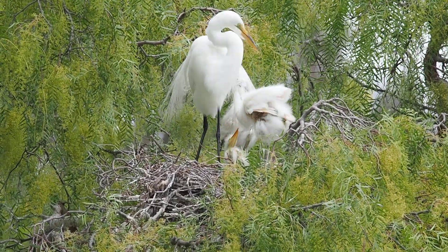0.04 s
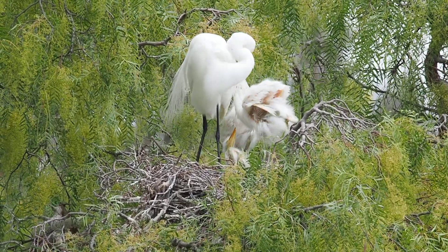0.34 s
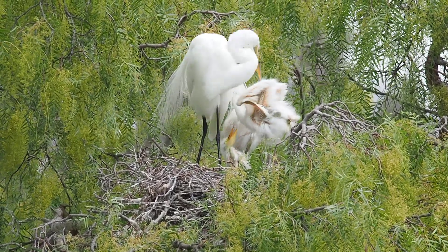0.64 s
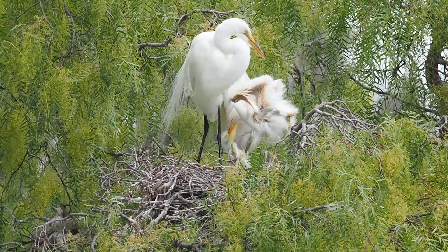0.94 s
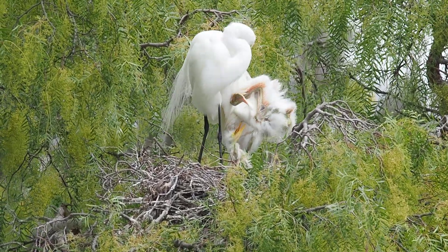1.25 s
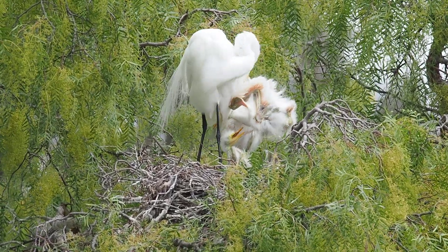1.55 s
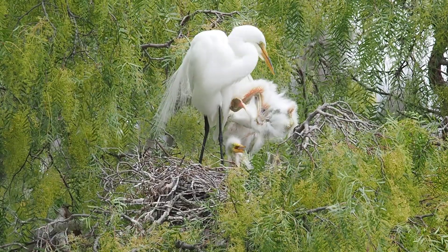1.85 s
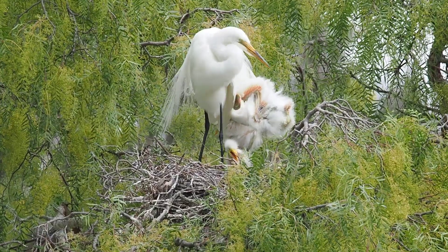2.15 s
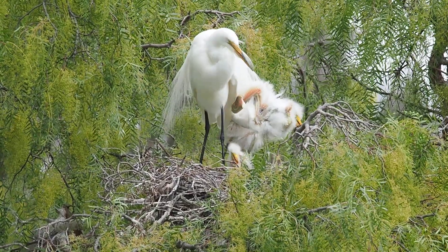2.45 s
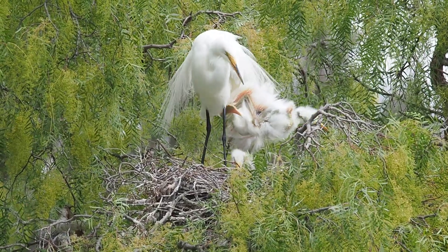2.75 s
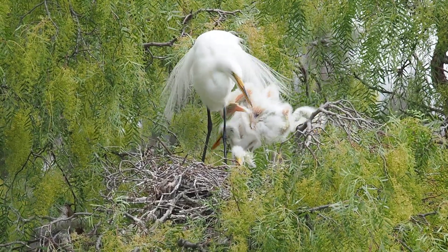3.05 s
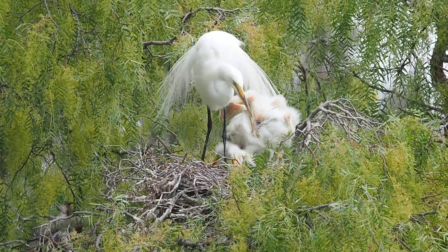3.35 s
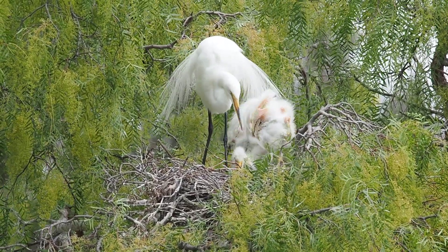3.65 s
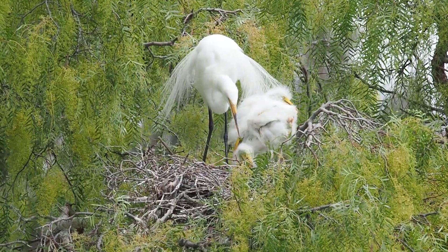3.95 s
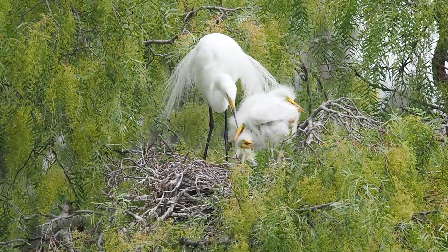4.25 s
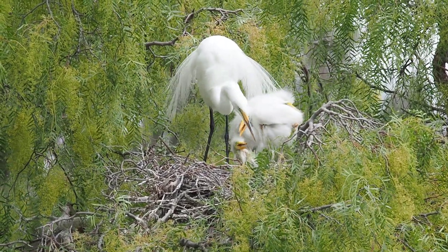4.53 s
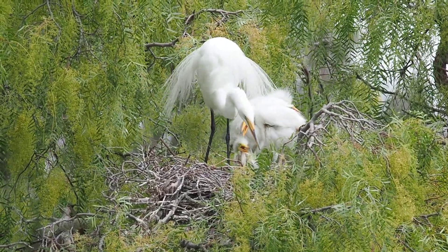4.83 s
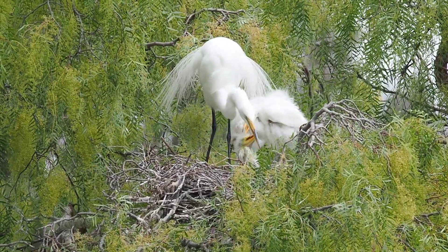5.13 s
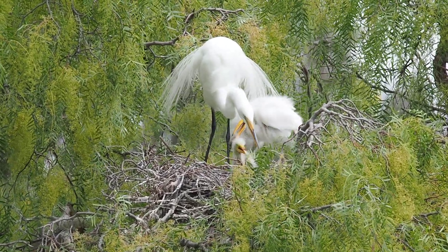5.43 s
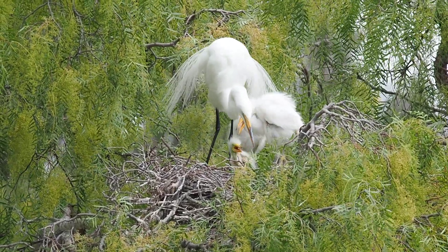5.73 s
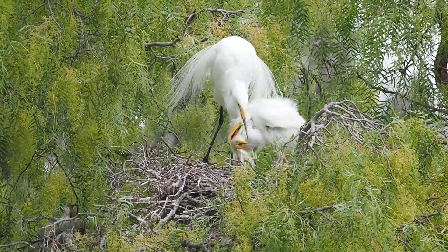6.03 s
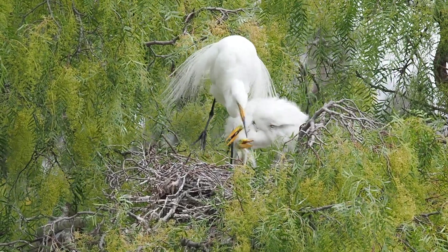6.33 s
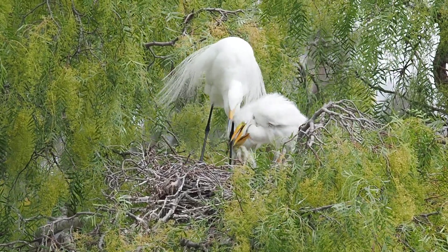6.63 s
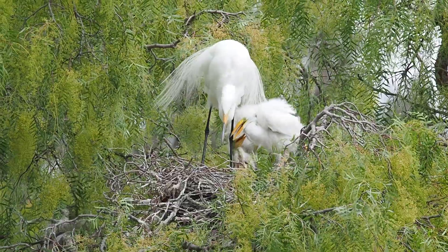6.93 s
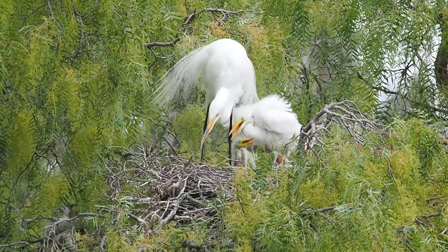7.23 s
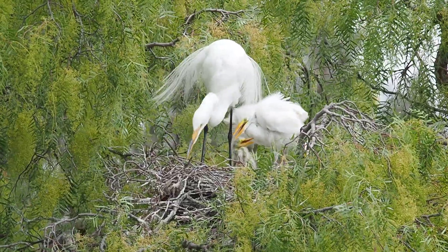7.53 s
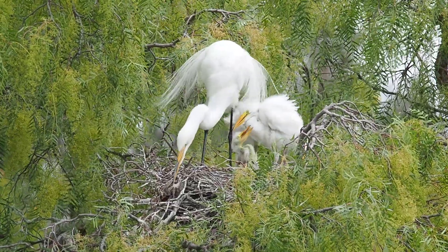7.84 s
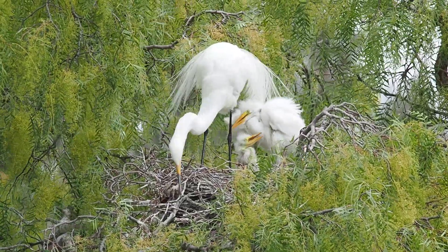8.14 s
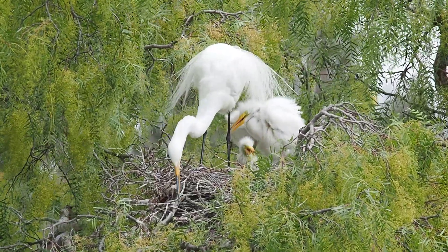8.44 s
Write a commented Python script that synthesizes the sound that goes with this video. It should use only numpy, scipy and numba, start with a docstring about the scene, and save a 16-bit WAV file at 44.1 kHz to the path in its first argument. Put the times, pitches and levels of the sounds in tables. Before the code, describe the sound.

Egret chicks beg from a nest in a tree some way off, with short, raspy, overlapping keks that never let up. Gusty wind rumbles and thumps on the microphone over a steady wash of distant traffic. Leaves hiss faintly early on. After a second, a faint hoarse rasp repeats far to the right, and a water bird honks briefly near four and seven seconds, with a faint echo.

```python
"""From the start, turbulent wind buffets the two microphone ports over a distant traffic wash.
At once egret chicks beg from a nest in a tree, some way off: short, raspy, overlapping keks, each a
pulse train filtered by throat and bill. Leaves hiss and other birds add a few soft notes. After a
second, something hoarse starts to rasp faintly about once a second. Near four and seven seconds a
water bird honks, and the far bank returns an echo."""
import sys
import numpy as np
from scipy import signal
from scipy.fft import rfft, irfft
from scipy.io import wavfile
from scipy.ndimage import uniform_filter1d
from numba import njit

SR = 44100
rng = np.random.default_rng(int(sys.argv[2]) if len(sys.argv) > 2 else 0)


def digitize_waveform(pressure):
    """Quantize a signal to 16-bit integers and store it at the path in sys.argv[1].

    Rows of a 2-D input are taken as channels; values are limited to [-1, 1].
    """
    field = np.atleast_2d(pressure).T
    bounded = np.clip(field, -1, 1)
    quanta = np.round(bounded * 32767).astype(np.int16)
    wavfile.write(sys.argv[1], SR, quanta)


N = 382788
T = np.arange(N) / SR
MODERATE_DB = -23  # level of a moderate gust


def undb(db):
    """Amplitude grows tenfold every 20 decibels."""
    return 10 ** (np.asarray(db) / 20)


def unit(x):
    """Normalisation to rms 1."""
    return x / np.sqrt(np.mean(x ** 2) + 1e-20)


def at_hz(points, hz):
    """Interpolation of (Hz, value) points on a log-frequency axis."""
    f, value = np.transpose(points)
    return np.interp(np.log(hz + 1e-3), np.log(f), value)


def colour(x, points):
    """Spectral shaping by a gain curve of (Hz, dB) points; the result has rms 1."""
    hz = np.fft.rfftfreq(x.shape[-1], 1 / SR)
    return unit(irfft(rfft(x) * undb(at_hz(points, hz)), x.shape[-1]))


def walk(rate, size=N):
    """Smooth random modulation of spread 1 that changes about rate times a second."""
    k = max(int(SR / rate), 2)
    held = np.repeat(rng.standard_normal(size // k + 2), k)
    return 1.235 * uniform_filter1d(held, k)[k // 2:k // 2 + size]


def add(out, s, x):
    """Superposition: x joins the mix at s seconds."""
    i = max(int(s * SR), 0)
    out[..., i:i + x.shape[-1]] += x[..., :max(N - i, 0)]


def pan(db):
    """Direction as a level difference, left minus right."""
    return undb(np.array([[db], [-db]]) / 2)


def arch(size):
    """A half-sine envelope, from silence to silence."""
    return np.sin(np.linspace(0, np.pi, size)).clip(0)


def swells(rows):
    """An amplitude envelope made of (start, length, dB) arches."""
    out = np.zeros(N)
    for s, length, db in rows:
        add(out, s, undb(db) * arch(int(length * SR)))
    return out


def gust_force():
    """Unsteady airflow: its strength at each port, in dB above a moderate gust."""
    # Each row: time in seconds, left level in dB, right level in dB.
    gusts = [(0.0, -25, -17), (0.18, -40, -27.5), (0.28, -38, -18), (0.58, -29.5, -20), (0.84, -38, -39),
             (0.98, -30, -19), (1.34, -31.5, -20.5), (1.56, -32.5, -27.5), (1.86, -40.5, -25.5),
             (2.08, -31, -37.5), (2.16, -42, -40.5), (2.36, -24.5, -26), (2.42, -18, -30.5),
             (2.78, -32.5, -19.5), (2.94, -26, -19.5), (3.32, -38.5, -41), (3.4, -31.5, -27),
             (3.62, -38, -19.5), (3.7, -31, -38.5), (3.76, -44, -41.5), (3.879, -33, -22.5),
             (4.18, -30, -21), (4.3, -35.5, -35), (4.36, -25.5, -28.5), (4.621, -39.5, -20.5),
             (4.88, -27, -18), (4.96, -32, -28), (5.12, -33, -23), (5.42, -25.5, -36), (5.5, -35, -35.5),
             (5.58, -30, -19.5), (5.74, -23.5, -19), (5.82, -37, -20.5), (6.24, -34, -21), (6.34, -29, -28),
             (6.62, -35, -28), (7.48, -26.5, -24), (8.16, -36, -25), (8.24, -37.5, -35), (8.66, -27, -22.5)]
    s, *ports = np.transpose(gusts)
    return np.array([np.interp(T, s, gust_db) for gust_db in ports]) - MODERATE_DB


def wind(flutter_db=(2.5, 1.82), trim_db=(.13, 1.66), burst_db=2.49, brighten=.4):
    """Turbulence at each port: faster air sheds smaller eddies, so upper octaves swell most, in bursts."""
    # Buffeting in a moderate gust. Each row: frequency in Hz, relative spectral density in dB.
    buffet = [(20, -60), (35, -17.5), (55, -3), (80, 0.5), (125, 1.5), (200, -3.5), (300, -15), (450, -21),
              (700, -37.5), (1200, -45), (2500, -59)]
    octaves = np.log2((np.fft.rfftfreq(N, 1 / SR) + 1e-3) / 125)
    out = np.zeros((2, N))
    for port, force_db, depth, trim in zip(out, gust_force(), flutter_db, trim_db):
        flutter = depth * walk(30)  # more fitful on the sheltered left
        bursts = burst_db * walk(130)
        eddies = rfft(colour(rng.standard_normal(N), buffet + [(6000, -110)]))
        for octave in range(-3, 5):
            band = irfft(eddies * (1 - abs(octaves - octave)).clip(0), N)
            swell_db = force_db * (1 + brighten * np.clip(octave, -1, 2))
            swing_db = swell_db + flutter + bursts * np.clip(octave, 0, 2)
            port += band * undb(MODERATE_DB + trim + swing_db)
    return out


def sputter(per_s=70, db=-44, steepness=2.2, scatter_db=4):
    """Shot noise: tiny eddies pop at random at each port, growing steeply with the gust."""
    # Spectrum of a pop. Each row: frequency in Hz, relative spectral density in dB.
    spectrum = [(120, -28), (300, 1), (430, 0.5), (700, -4.5), (1100, -18.5), (2200, -50), (6000, -80)]
    pops = (rng.random((2, N)) < per_s / SR) * rng.choice([-1, 1], (2, N))
    sizes = undb(scatter_db * rng.uniform(-1.5, 1, (2, N)))
    return colour(pops * sizes, spectrum) * undb(db + steepness * gust_force())


def far_noise():
    """Partial coherence: noise from all around is alike at both ports in the midrange, not the treble."""
    # Each row: frequency in Hz, correlation between the ports from 0 to 1.
    likeness = [(60, 0.3), (300, 0.8), (700, 0.96), (1400, 0.4), (3200, 0.04), (7000, 0.07), (15000, 0)]
    alike = at_hz(likeness, np.fft.rfftfreq(N, 1 / SR)).clip(0, 1)
    mid, side = rfft(rng.standard_normal((2, N))) * np.sqrt([1 + alike, 1 - alike])
    return irfft(np.array([mid + side, mid - side]), N)


def wash(db=-44, wander_db=.063):
    """Distant traffic and the far colony sum incoherently to a nearly steady noise."""
    # Each row: frequency in Hz, relative spectral density in dB.
    spectrum = [(25, 7.5), (100, 5.5), (250, -20), (430, 2.5), (550, -11.5), (700, 0.5), (950, 2),
                (1400, -4.5), (2000, -14.5), (2600, -15), (3400, -9), (4300, -14.5), (5000, -26),
                (8000, -25.5), (15500, -31)]
    return colour(far_noise(), spectrum) * undb(db + wander_db * walk(5.9))


def trees(x, wet_db, t60):
    """Scattering by trunks and foliage adds a diffuse tail that falls 60 dB in t60 seconds."""
    t = np.arange(SR // 2) / SR
    tail = rng.standard_normal((2, len(t))) * np.exp(-np.log(1000) * t / t60) * (t > .003)
    tail /= np.sqrt(np.sum(tail ** 2, axis=1, keepdims=True))
    return x + undb(wet_db) * signal.fftconvolve(np.atleast_2d(x), tail, axes=1)[:, :N]


def bird_notes():
    """Frequency glides: other birds give short, soft, nearly pure tones."""
    # Each row: start and length in seconds, first and last pitch in Hz, peak in dB,
    # left minus right in dB.
    glides = [(7.715, 0.016, 870, 1086, -26.5, -4), (5.275, 0.069, 385, 650, -43, -3),
              (0.083, 0.03, 3200, 2850, -46, -2)]
    out = np.zeros((2, N))
    for s, length, start_hz, end_hz, db, pan_db in glides:
        size, note = int(length * SR), np.zeros(N)
        phase = 2 * np.pi * np.cumsum(np.linspace(start_hz, end_hz, size)) / SR
        add(note, s, undb(db) * np.sqrt(arch(size)) * np.sin(phase))
        out += trees(note, wet_db=-4, t60=.15) * pan(pan_db)
    return out


def syrinx(hz, rough):
    """A pulse source with a puff of air in each cycle; jitter, shimmer and breath grow with roughness."""
    size = len(hz)
    jitter = .018 * walk(160, size) + .045 * rough * walk(400, size)
    cycles = np.cumsum(hz * (1 + jitter)) / SR + rng.random()
    from_pulse = (cycles + .5) % 1 - .5
    shimmer = undb((2 + 2.5 * rough) * walk(260, size))
    pulses = np.sinc(.8 * from_pulse * SR / hz) * shimmer
    air = rng.standard_normal(size) * np.exp(-(cycles % 1) / .45)
    return unit(pulses) + (.15 + .5 * rough) * unit(air)


@njit
def resonate(x, hz, width):
    """A moving resonance: a band-pass of fixed width in Hz whose centre follows hz."""
    y, band, low = np.empty(len(x)), 0., 0.
    for i in range(len(x)):
        g, k = np.tan(np.pi * hz[i] / SR), width / hz[i]
        v = (band + g * (x[i] - low)) / (1 + g * (g + k))
        band, low, y[i] = 2 * v - band, low + 2 * g * v, k * v
    return y


def kek(length, hz, throat_hz, db, bright_db, bill_hz=5700, bill_width_hz=1200.):
    """Source and filter: pitch and resonances rise as the bill opens and fall as it shuts."""
    # The voice, from broad clack to narrow squeak. Each row: pitch in Hz, throat bandwidth in Hz,
    # fall of its resonance as a share, roughness from 0 to 1, then bill ring, sizzle and croak in dB.
    voices = [(318, 770, .02, .34, -2, -10.5, -7.5), (450, 740, .06, .44, -9.5, -9, -14),
              (640, 470, 0.073, .48, -14.5, -9, -21)]
    # Fixed midrange colour of the calls, as the microphone hears them.
    # Each row: frequency in Hz, gain in dB.
    body_curve = [(1200, -9), (2000, -7.5), (2600, 1.5), (3050, 6), (3500, 3.5), (4250, 5), (4700, -6),
                  (6000, -41)]
    # Colours of the ring, sizzle and croak. Each row: frequency in Hz, gain in dB.
    bill_curve = [(3000, 6), (4000, -8), (4700, -3.5), (5600, -7), (6200, -10), (6800, -11), (8500, -13)]
    sizzle_curve = [(5800, 0.5), (7300, -4), (8200, 1), (8800, -10), (9600, 1.5), (11000, -11.5),
                    (13000, -13), (15500, -27)]
    croak_curve = [(600, -30), (1200, -13), (1700, 8), (2100, -5), (2600, -6), (3600, -30), (6000, -50)]
    pitches, *traits = np.transpose(voices)
    width_hz, fall, rough, ring_db, sizzle_db, croak_db = (np.interp(hz, pitches, c) for c in traits)
    slide, hoarse = rng.standard_normal(2) * [.05, .075]  # no two calls bend or rasp alike
    swell = arch(int(length * SR))
    progress = np.linspace(0, 1, len(swell))
    gape = np.sin(np.pi * progress ** .78).clip(0)  # the bill opens faster than it closes
    pitch = hz * (1 + .11 * (gape - .88) + slide * (progress - .5))
    voice = syrinx(pitch, np.clip(rough + hoarse, 0, 1))
    formant = throat_hz * (1 + .2 * (gape - .8) - fall * (progress - .5))
    throat = resonate(colour(voice, body_curve), formant, float(width_hz))
    bill = resonate(colour(voice, bill_curve), bill_hz * (1 + .3 * (gape - .95)), bill_width_hz)
    ring = undb(ring_db) * unit(bill * swell ** 1.5)  # strongest while the bill is wide open
    sizzle = undb(sizzle_db) * unit(colour(voice, sizzle_curve) * swell)
    croak = undb(croak_db) * unit(colour(voice, croak_curve) * swell)
    body = unit(throat * gape ** .5) + croak
    return undb(db) * body, undb(db + bright_db) * (ring + sizzle)


def twigs(x, echo_db, count=6):
    """Early reflections off nest and branches, anew for each port and each turn of the head."""
    out = np.array([x, x])
    for port in out:
        for lag, sign in zip(rng.integers(8, SR // 160, count), rng.choice([-1, 1], count)):
            port[lag:] += sign * undb(echo_db) * x[:-lag]
    return out / np.sqrt(1 + count * undb(echo_db) ** 2)


def chicks():
    """Superposition of begging calls, reflected by the nest and scattered by the tree."""
    # Each row: start and length in seconds, pitch and throat resonance in Hz, level in dB,
    # brightness in dB (the wider the bill opens, the brighter).
    calls = [(0.091, 0.076, 378, 3260, -51.5, -6), (.2, 0.1, 470, 3560, -49.5, -5),
             (.302, .088, 387, 3460, -46.5, -5), (.47, 0.09, 501, 3550, -47, -5.5),
             (.56, .13, 519, 3380, -48.5, -12), (.746, 0.079, 383, 3450, -51.5, -11),
             (.814, .1, 453, 3370, -48.5, -6), (.934, .048, 603, 2500, -54, -4),
             (1.02, 0.057, 402, 3400, -47, -10), (1.075, 0.087, 337, 3670, -52, -5),
             (1.179, 0.055, 565, 2950, -48, -6), (1.239, 0.12, 421, 3620, -49.5, -10),
             (1.42, 0.1, 334, 3580, -50.5, -4), (1.537, 0.12, 499, 3200, -47, -7),
             (1.676, .094, 410, 3700, -51.5, 1), (1.722, .096, 332, 3200, -49, -6),
             (1.82, 0.048, 575, 3260, -46, -9), (1.871, 0.036, 634, 2900, -53, -6),
             (1.927, 0.054, 285, 3900, -56, -3), (1.962, 0.078, 445, 3730, -50.5, -19),
             (2.022, .11, 455.4, 3450, -48.5, -1), (2.188, 0.13, 487, 3570, -47.5, -7.5),
             (2.285, 0.078, 455, 3580, -49.5, 2), (2.376, 0.08, 311.6, 3900, -51, -7),
             (2.501, .061, 626, 3270, -47, -4), (2.622, 0.12, 498, 3670, -47, -3),
             (2.787, 0.075, 329, 3700, -50, -3), (2.923, 0.069, 621, 3470, -44.5, -3),
             (2.963, 0.083, 327, 3440, -51, 1.5), (3.019, .1, 403, 3730, -53, -10),
             (3.259, 0.1, 613, 3480, -45.5, -2), (3.39, .11, 509, 3600, -53, -2.5),
             (3.517, 0.079, 632, 3360, -45.5, -3), (3.575, 0.082, 329, 3630, -52.5, -4),
             (3.842, .11, 331.4, 3560, -46, -10), (4.01, 0.096, 327, 3600, -51.5, 2),
             (4.11, 0.084, 610, 3220, -44, -3.5), (4.229, 0.14, 505, 3360, -49, -8),
             (4.434, .11, 303, 3460, -47.5, -5.5), (4.678, 0.11, 527, 3440, -47, -4.5),
             (4.785, 0.065, 614, 3100, -48.5, -5), (4.858, 0.074, 392, 3540, -51.5, 1),
             (5.059, 0.1, 422, 3500, -49.5, -3.5), (5.139, 0.069, 507, 3600, -49.5, -11),
             (5.246, 0.078, 637, 3630, -54, -8), (5.313, 0.097, 337, 3360, -48.5, -3),
             (5.573, 0.1, 288.5, 3760, -51, -6), (5.683, 0.045, 606, 3600, -45, -7),
             (5.736, 0.11, 319, 3140, -54.5, 0.5), (5.926, .071, 431, 3530, -51, -17),
             (6.033, 0.067, 632, 3620, -45.5, -9), (6.187, 0.085, 325, 3430, -51, 0.5),
             (6.414, 0.1, 427, 3510, -49.5, -1), (6.596, 0.083, 335, 3790, -58.5, 7),
             (6.701, 0.058, 625, 3680, -44, -4.5), (6.87, 0.11, 393, 3540, -47.5, -11),
             (7.044, 0.077, 468, 3800, -51, -3), (7.059, 0.076, 341, 3700, -49.5, -5),
             (7.18, .051, 458, 3330, -51.5, -8), (7.229, 0.11, 331, 3150, -56, 1),
             (7.312, .066, 630, 3600, -48, 2), (7.373, 0.06, 641, 3200, -53.5, 3),
             (7.567, .083, 429, 3700, -51.5, -14), (7.662, 0.074, 542, 3770, -46.5, -3),
             (7.702, .1, 332, 3000, -51, -3), (7.862, 0.047, 579, 2690, -51, -8),
             (7.941, 0.05, 294, 3200, -46, -8), (8.001, 0.085, 493, 3530, -47, -3),
             (8.147, 0.11, 456, 3200, -49.5, -10), (8.28, 0.09, 566, 3570, -48, -0.5),
             (8.391, 0.07, 393, 2700, -50.5, -3), (8.443, 0.096, 478, 3620, -50, -6),
             (8.629, 0.13, 450, 3140, -49, -2)]
    low, high = np.zeros((2, 2, N))
    for s, *call in calls + chatter():
        body, treble = kek(*call)
        add(low, s, twigs(body, echo_db=-14))
        add(high, s, twigs(treble, echo_db=-7.5))
    # leaves absorb the treble, so its tail is weaker
    return (trees(low, wet_db=-4, t60=.14) + trees(high, wet_db=-12, t60=.26)) * pan(db=1.5)


def chatter(gap_s=.33, length_s=.075, hz=479, throat_hz=3680, db=-51.5, bright_db=-8, spread=.12):
    """Random variation about one call gives rows of weaker, duller keks from deeper in the nest."""
    starts = np.arange(0, T[-1], gap_s)
    chance = rng.uniform(-1.1, 1, (len(starts), 4))
    return [(s + gap_s * (1 + late) / 2, length_s, hz * (1 + spread * sharp),
             throat_hz * (1 + spread * tight), db + 3 * loud, bright_db)
            for s, (late, sharp, tight, loud) in zip(starts, chance)]


def leaves(flutter_db=2):
    """Amplitude-modulated treble noise: leaves overhead hiss in the breeze."""
    # Each row: start in seconds, length in seconds, level in dB.
    breezes = [(.15, 0.98, -69), (1.3, 0.5, -58.5), (2.3, 0.47, -66)]
    # Each row: frequency in Hz, gain in dB.
    spectrum = [(4000, -43), (5200, 3), (6400, 7), (7400, -2), (8400, -4), (9500, -18), (13000, -22)]
    return colour(far_noise(), spectrum) * swells(breezes) * undb(flutter_db * walk(40.6))


def thumps(cycles=.4):
    """A pressure transient: an eddy hits a port and gives it a single swing."""
    # Each row: time in seconds, peak in dB, frequency in Hz, left minus right in dB.
    eddies = [(0.468, -20, 330, -19), (1.041, -20, 121, -22), (1.484, -18, 280, -25),
              (2.386, -15.5, 178, 21.5), (2.436, -14.5, 146, 22), (2.892, -17, 139, 14),
              (3.143, -22, 142, 23), (4.404, -13, 151, 2), (5.222, -32, 146, 14), (5.397, -22.5, 161, 25.5),
              (5.732, -12, 124, 18), (6.324, -17, 133, 20), (6.641, -16, 131, -15),
              (6.896, -23.5, 161, -24), (7.059, -18.5, 288, -23), (7.436, -18, 162, 13),
              (7.686, -23.5, 131, -25)]
    out = np.zeros((2, N))
    t = np.arange(-SR // 50, SR // 50) / SR
    for s, db, hz, pan_db in eddies:
        swing = -np.cos(2 * np.pi * hz * t) * np.exp(-(hz * t / cycles) ** 2)
        add(out, s + t[0], undb(db) * pan(pan_db) * swing)
    return out


def rasps(flutter_db=1.5):
    """Narrow-band noise in fluttering swells: something hoarse, far off to the right."""
    # Each row: start in seconds, length in seconds, level in dB.
    calls = [(1.25, 0.77, -47), (2.3, 0.65, -51), (3.55, 0.68, -46.5), (4.55, 0.54, -50.5),
             (5.72, 0.68, -47.5), (6.95, 0.66, -51), (8.1, 0.61, -45.5)]
    # Each row: frequency in Hz, gain in dB.
    spectrum = [(400, -45), (800, -22), (1150, -11), (1280, -4), (1400, 0), (1480, -5), (1580, -14),
                (1720, -16), (1900, -30), (3000, -38), (6000, -65)]
    return colour(far_noise(), spectrum) * swells(calls) * undb(flutter_db * walk(50)) * pan(db=-14)


def honks(jitter=.0026, rasp_db=-3, echo_s=.31, echo_db=-27):
    """A reedy harmonic tone starts hoarse, clears and sags; reflection at the far bank returns it."""
    # Each row: start and length in seconds, reference pitch in Hz, reference level in dB.
    calls = [(4.003, 0.11, 798, -33.5), (7.211, 0.12, 799.5, -33)]
    # Course of a honk. Each row: share of the length, pitch ratio, gain in dB, roughness (0 is clear).
    course = [(0, .93, -10, 1.33), (.13, 0.97, 0.5, 1.1), (.28, 0.98, 5, 0.22), (.5, 0.98, 5, 0.02),
              (.7, .985, 1, .05), (.87, 0.93, -2.5, 0), (1, 0.99, -16, 0.3)]
    # Each row: harmonic number, relative level in dB.
    partials = [(1, 6.5), (2, 1), (3, -14), (4, -29), (5, -25), (6, -59), (7, -39), (8, -32)]
    # Each row: frequency in Hz, gain in dB.
    rasp_curve = [(500, -39), (800, -2), (1200, -1), (1550, -12), (2100, -41), (6000, -60)]
    out, echo = np.zeros((2, N))
    share, *shape = np.transpose(course)
    for s, length, hz, db in calls:
        size = int(length * SR)
        ratio, swell_db, rough = (np.interp(np.linspace(0, 1, size), share, c) for c in shape)
        pitch = hz * ratio * (1 + (jitter + .024 * rough) * walk(500, size))
        phase = 2 * np.pi * np.cumsum(pitch) / SR
        tone = unit(sum(undb(level) * np.sin(k * phase) for k, level in partials))
        rasp = colour(rng.standard_normal(size), rasp_curve)
        add(out, s, undb(db + swell_db) * ((1 - .5 * rough) * tone + undb(rasp_db) * rough * rasp))
    add(echo, echo_s, colour(out, [(700, -10), (1570, -5), (3000, -20)]) * np.std(out))
    direct = trees(out, wet_db=-14, t60=.3) * pan(db=-6.5)
    return direct + undb(echo_db) * trees(echo, wet_db=4, t60=1.0)


def scene():
    """Superposition: the pressures of all sources add at the two ports."""
    birds = chicks() + honks() + bird_notes()
    buffeting = wind() + sputter() + thumps()
    return birds + buffeting + wash() + rasps() + leaves()


def record(dry, ease_s=.006, top_hz=15500):
    """Band limiting: a steep low-pass cuts the top of the sound, which eases in and out."""
    ease = (np.minimum(T, T[-1] - T) / ease_s).clip(0, 1)
    return signal.sosfilt(signal.ellip(10, .1, 80, top_hz, fs=SR, output="sos"), dry * ease)


dry = scene()
out = record(dry)
digitize_waveform(out)
```